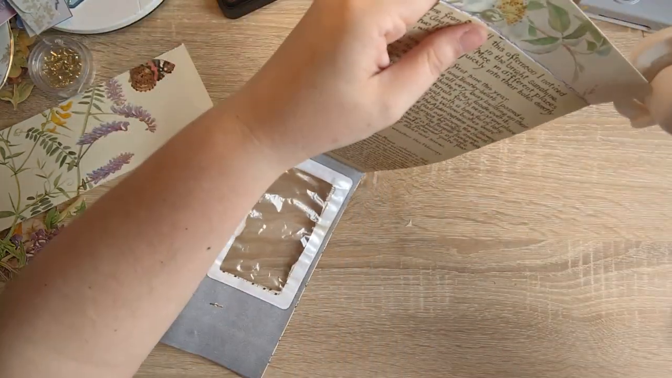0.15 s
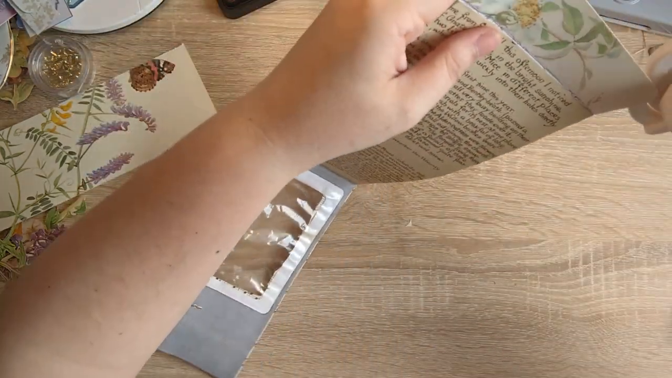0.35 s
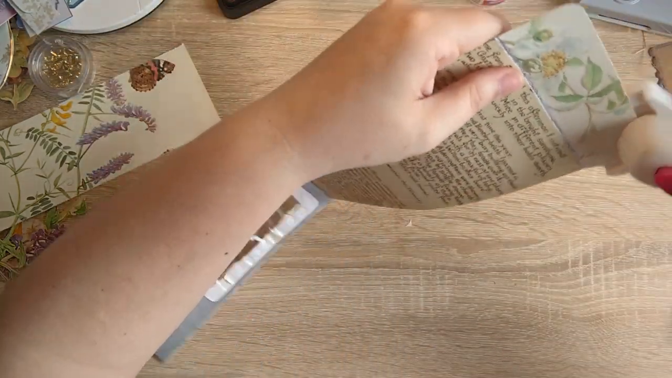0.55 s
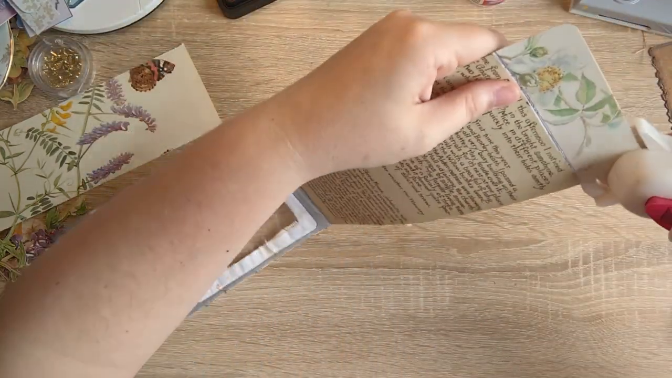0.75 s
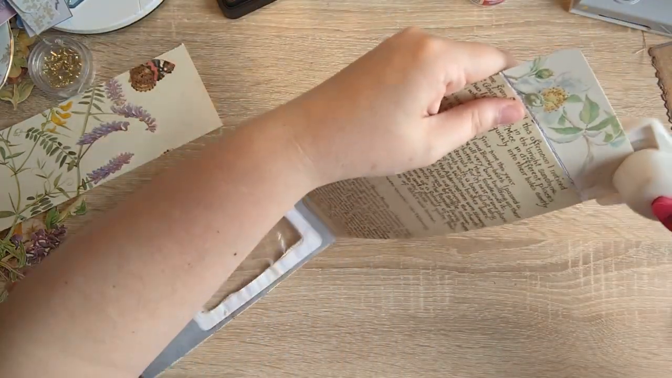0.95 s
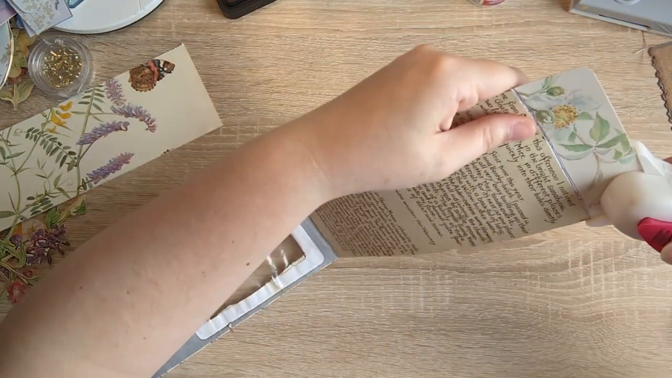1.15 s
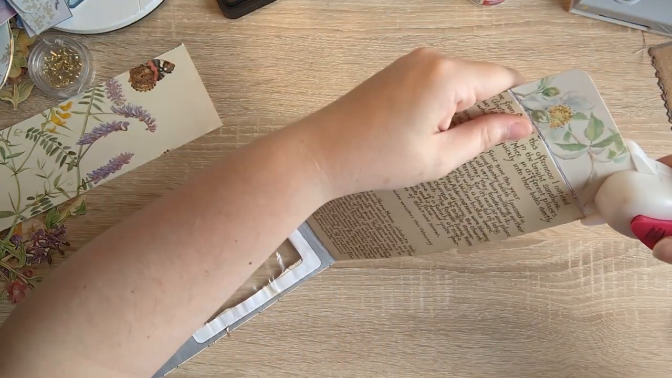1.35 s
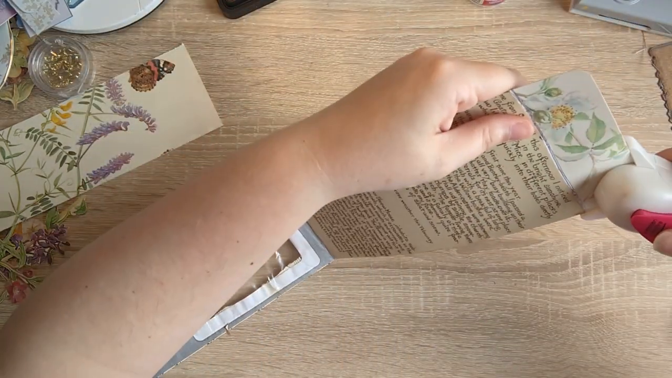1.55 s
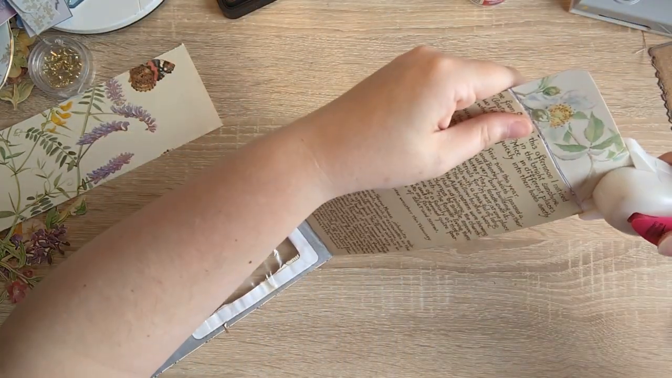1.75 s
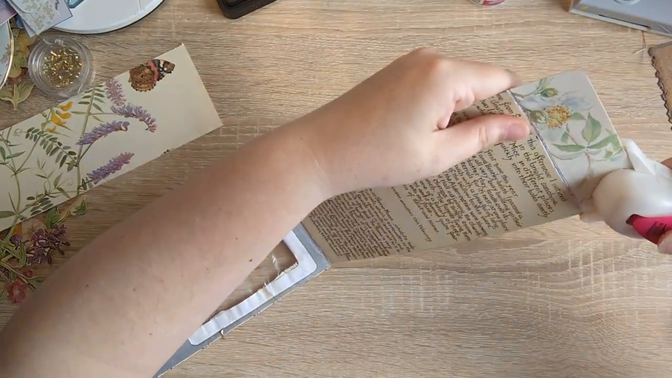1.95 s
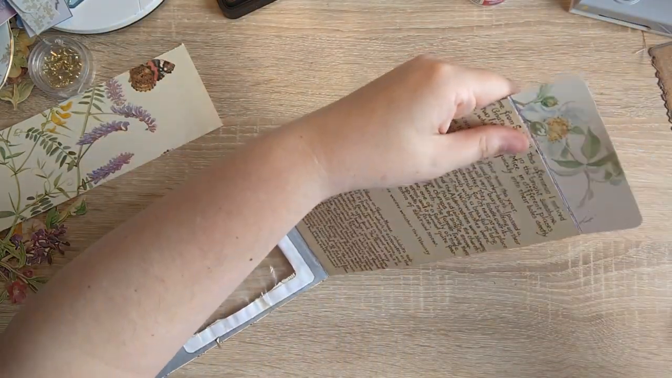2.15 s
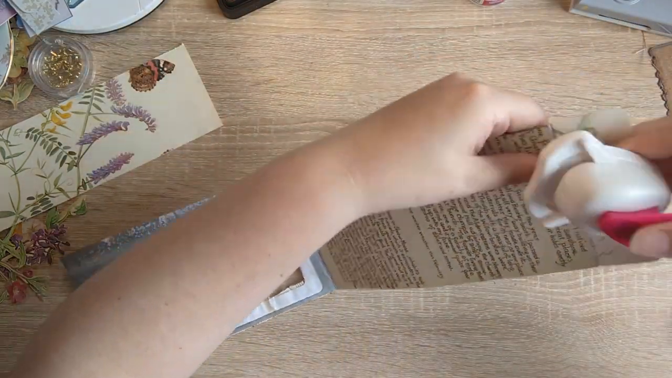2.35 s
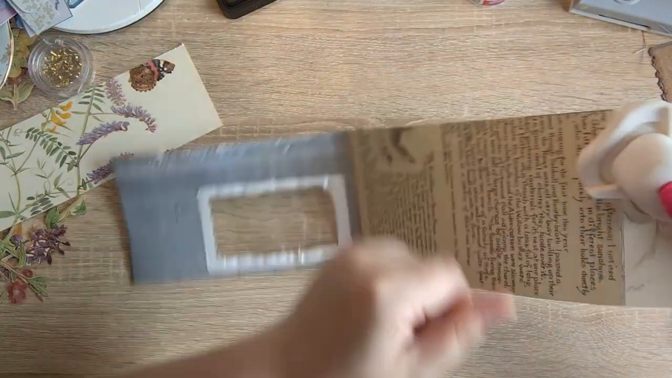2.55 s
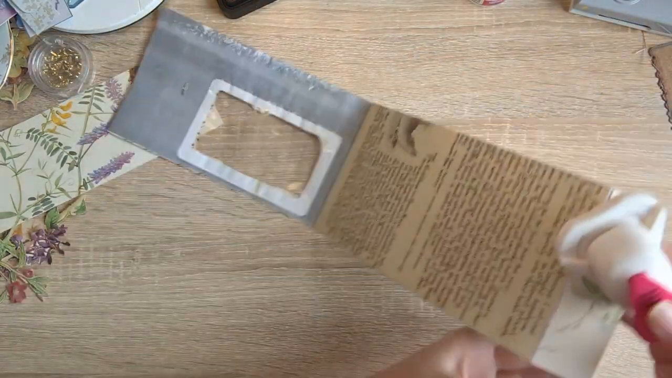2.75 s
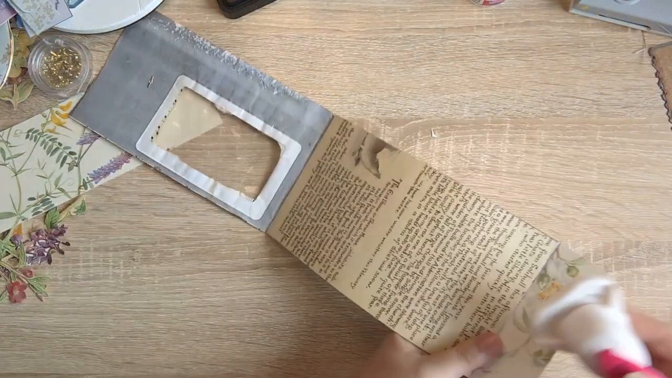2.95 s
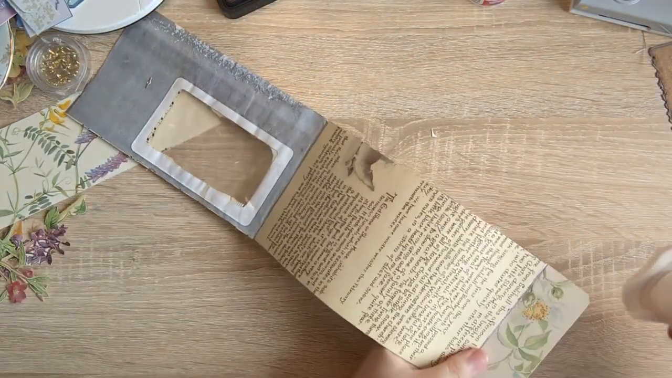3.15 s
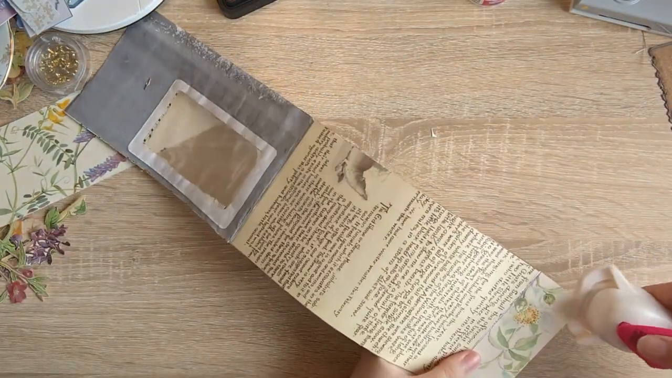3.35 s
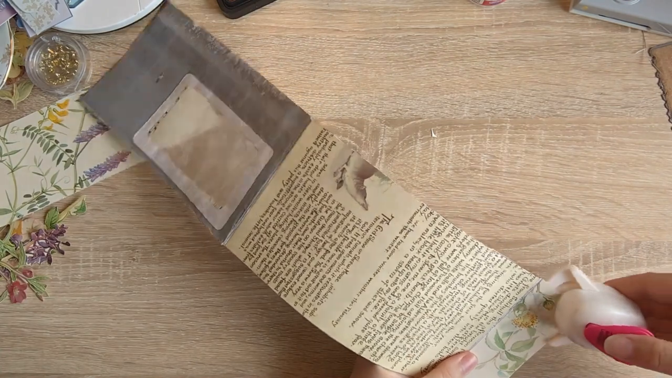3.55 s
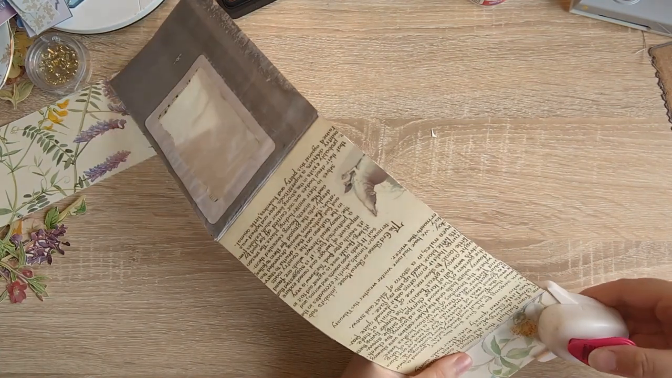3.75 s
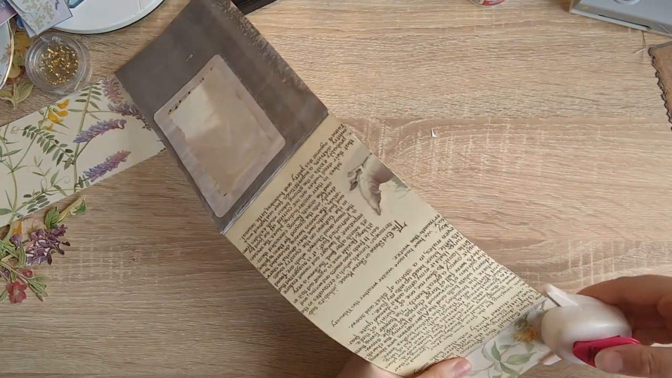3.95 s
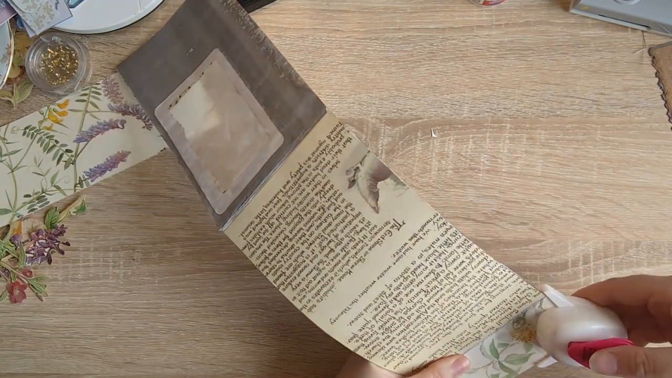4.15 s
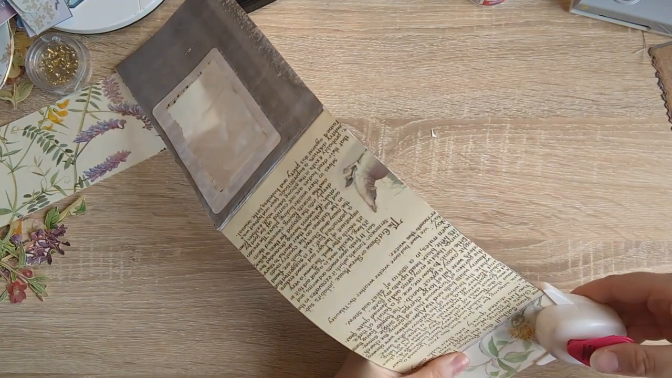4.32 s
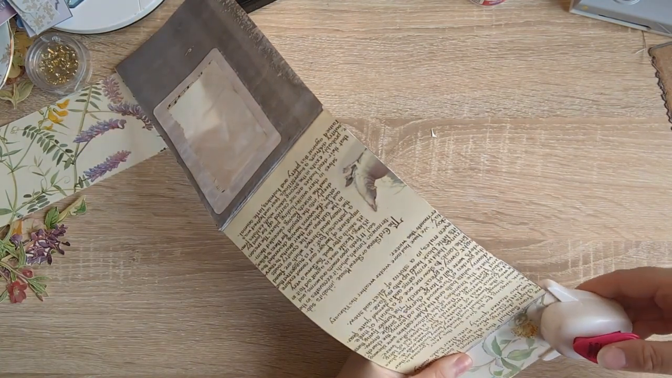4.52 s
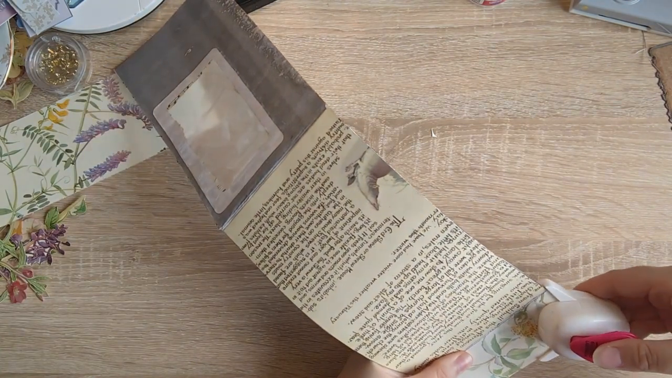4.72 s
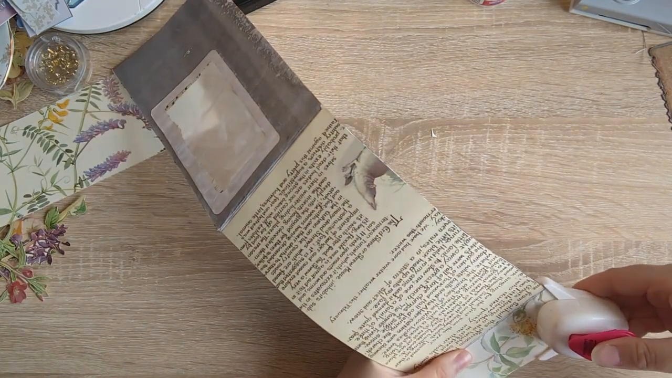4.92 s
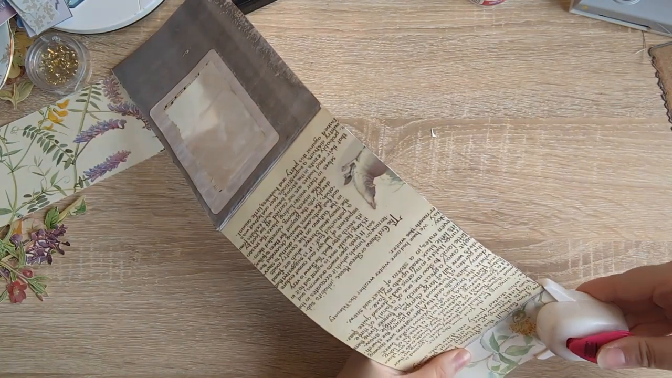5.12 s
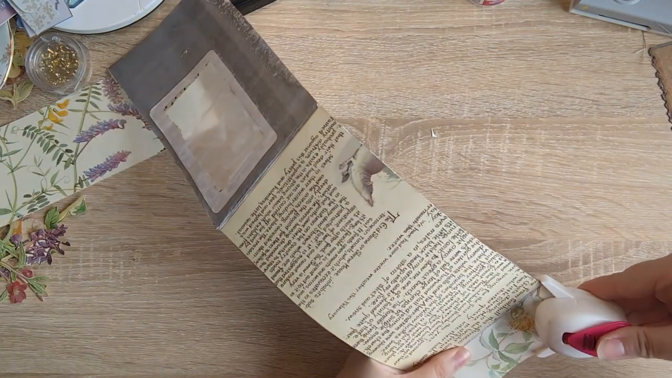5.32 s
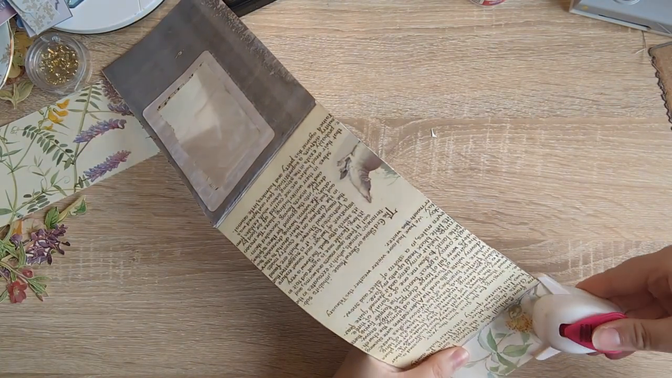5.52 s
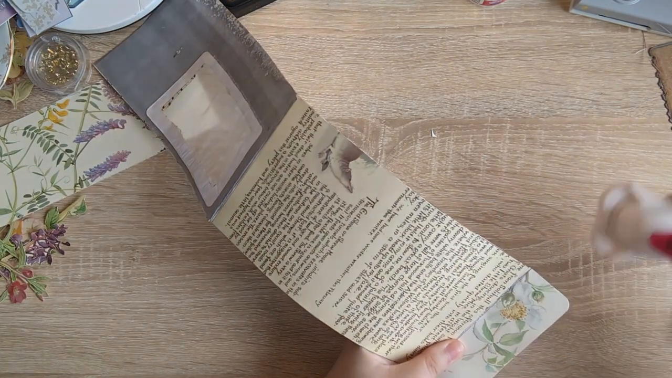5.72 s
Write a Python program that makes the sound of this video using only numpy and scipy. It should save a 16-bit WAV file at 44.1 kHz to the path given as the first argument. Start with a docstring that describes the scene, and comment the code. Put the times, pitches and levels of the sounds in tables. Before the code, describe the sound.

Stiff paper rustles and taps against a plastic corner punch, which snaps through it twice with a loud crack.

```python
"""Corner punch at a desk

Small room, a spaced pair of microphones close by, a wooden desk below. Just right of centre a
hand-held plastic punch rounds two corners of a stiff paper wallet. The paper goes in with small
knocks; each cut is a crack that just reaches overload, a short crunch and faint ringing tones.
Between the cuts the paper is turned in the middle of the image, rustling and snapping."""
import sys
import numpy as np
from scipy import signal
from scipy.fft import rfft, irfft
from scipy.io import wavfile

SR = 44100
rng = np.random.default_rng(int(sys.argv[2]) if len(sys.argv) > 2 else 0)


def store_pcm(level_fs):
    """Save levels as 16-bit WAV."""
    pcm = np.round(np.clip(level_fs, -1, 1) * 32767).astype(np.int16)
    wavfile.write(sys.argv[1], SR, np.atleast_2d(pcm).T)


N = 259308

# room tone: f/Hz, spectral level/dB
ROOM_TONE_COLOUR = [(15, -48), (25, -4), (102, 0.5), (166, -5.5), (270, -16.5), (440, -15.5), (863, -15),
                    (2000, -6.5), (3500, -12.5), (9840, -15), (16000, -22.5)]
# decay of the room: f/Hz, t60/s
ROOM_DECAY = [(100, 0.093), (300, 0.15), (800, 0.2), (2000, 0.19), (5000, 0.25), (10000, 0.19),
              (16000, 0.22)]
# low ring of the desk top: f/Hz, width/Hz, level/dB
DESK_MODES = [(166, 19, -9.5), (337, 11.7, -4), (440, 37, -9), (580, 97, -5.5)]
# colours of paper flapping, flexing and snapping, a metal tick and a cut: f/Hz, spectral level/dB
FLAP_COLOUR = [(40, -9), (100, 15), (200, -10.5), (400, 3), (700, 5), (1500, -9.5)]
FLEX_COLOUR = [(300, -38), (800, -13.5), (1400, 0), (2100, 4), (2800, 0), (4000, -16.5), (8000, -41)]
SNAP_COLOUR = [(1200, -25.5), (2500, -46), (3400, 0.5), (5000, -2), (7000, -1), (9000, -4.5), (12000, -5),
               (16000, -3.5)]
TICK_COLOUR = [(1500, -5.5), (3000, 7), (4000, 6), (5100, -3.5), (6300, 8), (8000, -1), (10000, 7.5),
               (13000, -3), (16000, -3)]
BLADE_COLOUR = [(30, -34.5), (60, -24), (200, -27.5), (330, -18), (450, -20), (700, -17.5), (1300, -8.5),
                (1800, 0.5), (2200, 0), (2900, -5), (4000, -6), (5100, -12.5), (6400, -5.5), (8000, -11),
                (9500, -1.5), (11300, -5.5), (14500, -5), (16000, -8.5)]
# boom of the sheet and knock of the plastic shell: multiple of the pitch, spectral level/dB
BOOM_SHAPE = [(.08, -46), (.2, -9), (.5, -9.5), (1, 4), (1.5, 0.5), (2.4, -7.5), (5, -31.5)]
SHELL_SHAPE = [(.1, -43.5), (.28, -34), (.42, -10.5), (.6, -2), (.8, 1), (1, 0.5), (1.35, -1.5),
               (1.7, -11.5), (3, -21.5), (6, -33)]
# the loose end swings: middle t/s, half length/s, level/dB
SHEET_SWINGS = [(1.0, .3, -68), (3.02, .07, -50.5), (3.737, 0.14, -45)]
# the paper slides: t/s, length/s, level/dB, rub on the punch re hiss/dB
SHEET_SLIDES = [(0.066, 1, -65.5, -1), (0.255, 0.021, -58.5, 7), (0.684, 0.6, -55, 0),
                (0.773, 0.032, -39.5, 0), (1.208, 0.13, -45, -1.5), (2.03, 0.13, -52.5, 0.5),
                (2.18, 0.51, -65.5, 1.5), (2.43, 0.15, -57.5, 4), (2.733, 0.37, -51, -7),
                (3.143, 0.095, -59, -6), (3.398, 0.41, -63.5, 1), (3.64, 0.48, -63.5, 5.5),
                (4.183, 0.057, -49.5, 2), (4.607, 0.09, -62.5, 2.5), (4.756, 0.1, -57, 3.5),
                (5.692, .13, -46.5, -0.5)]
# soft swells and two short dull knocks of the sheet: middle t/s, half length/s, f/Hz, level/dB
SHEET_SWELLS_AND_KNOCKS = [(2.148, 0.038, 267, -24.5), (2.464, 0.015, 231, -18), (3.035, 0.0023, 975, -22),
                           (3.563, 0.089, 760, -23), (3.69, 0.021, 570, -16), (5.477, 0.0051, 483, -18.5),
                           (5.76, 0.018, 358, -21.5)]
# the paper buckles: t/s, level/dB
SHEET_SNAPS = [(0.9139, -7.5), (1.1907, -14), (2.4664, -20), (2.499, -20.5), (2.533, -18), (2.6417, -23),
               (2.6489, -13.5), (2.703, -10.5), (2.799, -17.5), (2.886, -17), (2.9057, -17.5),
               (2.9793, -18.5), (3.0461, -14.5), (3.0729, -9), (3.1356, -5.5), (3.223, -14.5),
               (3.237, -18.5), (3.345, -19.5), (3.7281, -14.5), (3.8233, -14.5), (5.7902, -12.5)]
# the free part of the sheet booms higher with each grip: from t/s, f/Hz, desk contact/dB
SHEET_GRIPS = [(0, 330, -1.5), (2.9, 480, 5.5), (4.5, 700, 3)]
# paper and fingers knock on the punch: t/s, level/dB, shell f/Hz, metal tick re knock/dB
PUNCH_KNOCKS = [(0.1447, -15.5, 1790, -3.5), (0.4396, -30, 2170, -11), (0.5864, -29.5, 2270, -12),
                (0.6407, -7.5, 1700, -52), (0.7227, -23, 2000, 1), (0.7849, -18, 2130, -8),
                (0.822, -23.5, 2300, 7), (0.8938, -10.5, 1790, -3.5), (0.9469, -18.5, 1580, 0.5),
                (1.0349, -8.5, 2110, -3), (1.0683, -4.5, 2170, -3.5), (1.2005, -8.5, 1800, -7.5),
                (1.2406, -18, 1940, 6.5), (1.251, -8.5, 2060, -10), (1.294, -20.5, 2330, 12.5),
                (2.125, -24.5, 1840, 1), (3.413, -26, 2300, -1), (3.498, -28.5, 2020, -20),
                (3.5251, -20.5, 1920, -17), (3.641, -7.5, 1970, -18.5), (3.7444, -11, 2200, -10),
                (3.991, -25.5, 1830, -2.5), (4.0467, -28.5, 2040, -4), (4.083, -25, 2120, -2.5),
                (4.2012, -16.5, 1520, -4.5), (4.4815, -31, 2300, 3.5), (4.8073, -8, 1480, -9),
                (5.625, -29.5, 1510, -29), (5.6671, -15, 2100, -13)]
# faint ringing tones after each cut: f/Hz, level/dB, t60/s
CUT_RING_TONES = [(1800, 16, 0.18), (1885, -5.5, 0.27), (2260, -2.5, 0.52), (2240, -4.5, .18),
                  (2300, -15.5, 0.23), (3350, -20.5, 0.067), (3550, -1.5, 0.057), (5700, -16, 0.06),
                  (6584, -4, .15), (8300, 12.5, 0.064), (9330, -7, .15), (9100, -14.5, .16),
                  (11600, -2.5, .18), (13200, -7.5, 0.23), (13200, -3, .2), (14800, -6, 0.1),
                  (13500, -18.5, .12), (13200, -6.5, .14), (14930, 0, 0.093)]
# the cuts: t/s, crack/dB, crunch/dB, hollow shell ring f/Hz, its level/dB, desk thud/dB
CORNER_CUTS = [(1.9123, 15.5, 16, 886, -5, -19.5), (5.3974, 13, 16.5, 455, -9, -24)]

MIC_GAP_S = .00038   # travel time between the microphones, about 13 cm


def from_db(db):
    """Decibels to gain."""
    return 10 ** (np.asarray(db) / 20)


def unit(x):
    """Scale to a mean energy of one per channel."""
    return x / np.sqrt(np.mean(np.sum(x ** 2, axis=-1)) + 1e-20)


def add(track, s, sound):
    """Mix a sound into a track at time s."""
    start = round(s * SR)
    track[start:start + len(sound)] += sound[:N - start]


def pitched(shape, hz):
    """Place a colour given in multiples of a pitch at that pitch."""
    return [(multiple * hz, db) for multiple, db in shape]


def coloured(x, colour):
    """Causal (minimum-phase) filter; the colour is read on a log-frequency axis."""
    size = 2 ** 12
    hz = np.maximum(np.fft.rfftfreq(size, 1 / SR), 1)
    knot_hz, knot_db = np.transpose(colour)
    gain = from_db(np.interp(np.log(hz), np.log(knot_hz), knot_db))
    cepstrum = irfft(np.log(gain))
    cepstrum[1:size // 2] *= 2
    cepstrum[size // 2 + 1:] = 0
    response = np.array(irfft(np.exp(rfft(cepstrum))), ndmin=x.ndim)
    return signal.fftconvolve(x, response, axes=-1)[..., :x.shape[-1]]


def resonance(x, hz, width_hz):
    """Two-pole resonance with a peak gain of one."""
    r = np.exp(-np.pi * width_hz / SR)
    feedback = [1, -2 * r * np.cos(2 * np.pi * hz / SR), r * r]
    return signal.lfilter(np.array([1, 0, -1]) * (1 - r * r) / 2, feedback, x)


def contact(spread_s, patchy_db):
    """A touch whose frequencies arrive scattered over a moment, each a little stronger or weaker."""
    size = 2 ** 13
    hz = np.fft.rfftfreq(size, 1 / SR)
    knots = np.linspace(0, SR / 2, num=90)
    delay_s = np.interp(hz, knots, spread_s * np.minimum(rng.exponential(1, len(knots)), 2))
    gain = from_db(np.interp(hz, knots, patchy_db * rng.standard_normal(len(knots))))
    phase = -2 * np.pi * np.cumsum(delay_s) * hz[1]
    return unit(irfft(gain * np.exp(1j * phase))[:size // 2])


def grains(per_s, spread_db, size):
    """Random tiny clicks of uneven strength; rms 1."""
    born = rng.random(size) < per_s / SR
    strength = from_db(spread_db * np.minimum(rng.exponential(1, size), 4))
    return unit(born * strength * rng.standard_normal(size)) * np.sqrt(size)


def diffuse(size):
    """Noise from all directions on the spaced pair: alike in the bass only."""
    alike = .95 * np.sinc(2 * np.fft.rfftfreq(size, 1 / SR) * MIC_GAP_S)
    mid, side = rfft(rng.standard_normal((2, size)))
    return irfft(np.sqrt(1 + alike) * mid + np.sqrt(1 - alike) * side * [[1], [-1]], size)


def room_tone(rms_db):
    """Faint, steady, bass-heavy noise all round the microphones."""
    return from_db(rms_db) * unit(coloured(diffuse(N), ROOM_TONE_COLOUR)) * np.sqrt(N)


def in_room(x, lag_s, pan_db, room_db, desk_db, smear_s):
    """At the pair: direct sound smeared by the hands, a desk bounce, a tail dying band by band."""
    size = SR // 2
    t, hz = np.arange(size) / SR, np.fft.rfftfreq(size, 1 / SR)
    noise = rfft(diffuse(size))
    log_centres = np.log([centre_hz for centre_hz, _ in ROOM_DECAY])
    tail = 0
    for share, (_, t60) in zip(np.eye(len(ROOM_DECAY)), ROOM_DECAY):
        band = irfft(noise * np.interp(np.log(hz + 1), log_centres, share), size)
        tail += band * from_db(-60 * t / t60)
    build_up = np.clip((t - .001) / .0013, 0, 1)
    response = from_db(room_db) * unit(tail * build_up)
    left, right = (lag_s, pan_db / 2, .0013), (0, -pan_db / 2, .0011)
    for channel, (late_s, side_db, bounce_s) in enumerate([left, right]):
        path = from_db(side_db) * contact(spread_s=smear_s, patchy_db=0.5)
        add(response[channel], late_s, path)
        add(response[channel], late_s + bounce_s, from_db(desk_db) * path)
    return signal.fftconvolve(x[None], response, axes=1)[:, :N]


def desk(touch, uneven_db):
    """The low modes of the desk top, each as strong as the chance place of the blow makes it."""
    return sum(from_db(db + uneven_db * rng.standard_normal()) * unit(resonance(touch, hz, width_hz))
               for hz, width_hz, db in DESK_MODES)


def rustle(colour, per_s, spread_db):
    """Fibres catch and slip at random; rms 1."""
    return unit(coloured(grains(per_s, spread_db, N), colour)) * np.sqrt(N)


def swings(flap_db):
    """The loose end flaps softly as it swings through the air."""
    t = np.arange(N) / SR
    speed = sum(from_db(db) * np.exp(-((t - s) / half_s) ** 2) for s, half_s, db in SHEET_SWINGS)
    return from_db(flap_db) * speed * rustle(FLAP_COLOUR, per_s=920, spread_db=3.5)


def slides(hiss_db, rub_db, crackle_db):
    """Each stroke speeds up, holds and dies away: the sheet hisses, crackles and rubs on the punch."""
    attack_s, release_s = 0.025, 0.01
    t = np.arange(N) / SR
    sliding, rubbing = np.zeros(N), np.zeros(N)
    for s, length_s, db, on_punch_db in SHEET_SLIDES:
        stroke = np.clip((t - s) / attack_s, 0, 1)
        stroke *= np.exp(-np.maximum(t - s - length_s, 0) / release_s)
        sliding = np.maximum(sliding, from_db(db) * stroke)
        rubbing = np.maximum(rubbing, from_db(db + on_punch_db) * stroke)
    hiss = from_db(hiss_db) * rustle(SNAP_COLOUR, per_s=5600, spread_db=5)
    hiss += from_db(crackle_db) * rustle(SNAP_COLOUR, per_s=90, spread_db=2.5)
    rub = from_db(rub_db) * rustle(FLEX_COLOUR, per_s=2500, spread_db=1)
    rub += from_db(crackle_db) * rustle(FLEX_COLOUR, per_s=90, spread_db=2.5)
    return sliding * hiss + rubbing * rub


def swells_and_dull_knocks():
    """Noise in a resonance of the sheet: soft swells, the two shortest heard as dull knocks."""
    out, t = np.zeros(N), np.arange(N) / SR
    for s, half_s, hz, db in SHEET_SWELLS_AND_KNOCKS:
        boom = coloured(rng.standard_normal(N), pitched(BOOM_SHAPE, hz))
        envelope = np.exp(-((t - s) / half_s) ** 2)
        out += from_db(db) * unit(boom * envelope)
    return out


def snaps(bend_octaves, bend_db):
    """A crease pops and the sheet flexes; bent in the turn it stiffens, flexing higher and less."""
    turn_start_s, turn_end_s, ramp_s = 2.65, 3.283, 0.061
    out = np.zeros(N)
    for s, db in SHEET_SNAPS:
        pop = contact(spread_s=0.0021, patchy_db=2)
        bend = np.clip(min(s - turn_start_s, turn_end_s - s) / ramp_s, 0, 1)
        flex = coloured(pop, pitched(FLEX_COLOUR, 2 ** (bend_octaves * bend)))
        add(out, s, from_db(db) * unit(coloured(pop, SNAP_COLOUR)))
        add(out, s, from_db(db + bend_db * bend) * unit(flex))
    return out


def knocks(shell_db, boom_db, tick_db, desk_db):
    """Each touch rings the damped plastic shell, thumps sheet and desk, and ticks on the metal."""
    shell_hz, firm_knock_db = 1806, -2
    out = np.zeros(N)
    for s, db, hz, metal_db in PUNCH_KNOCKS:
        touch = contact(spread_s=0.0014, patchy_db=3)
        sheet_hz, on_desk_db = [grip[1:] for grip in SHEET_GRIPS if grip[0] <= s][-1]
        # a lower or heavier knock reaches deeper into sheet and desk
        depth_db = -16 * np.log2(hz / shell_hz) + 0.22 * (db - firm_knock_db)
        parts = [(pitched(SHELL_SHAPE, hz), shell_db),
                 (pitched(BOOM_SHAPE, sheet_hz), boom_db + depth_db),
                 (TICK_COLOUR, tick_db + metal_db)]
        for colour, part_db in parts:
            add(out, s, from_db(db + part_db) * unit(coloured(touch, colour)))
        add(out, s, from_db(db + desk_db + on_desk_db + depth_db) * desk(touch, uneven_db=8))
    return out


def cuts(crack_s, crunch_s, ring_db):
    """The blade cracks through and crunches past the fibres; the shell and faint tones ring on."""
    out, t = np.zeros(N), np.arange(SR // 2) / SR
    swell = t / crunch_s * np.exp(-(t / crunch_s) ** 2)
    for s, crack_db, crunch_db, hollow_hz, hollow_db, thud_db in CORNER_CUTS:
        fibres = grains(per_s=12000, spread_db=0.61, size=len(t))
        force = from_db(crunch_db) * unit(fibres * swell)
        add(force, 0, from_db(crack_db) * contact(spread_s=crack_s, patchy_db=1.5))
        blow = unit(coloured(force, BLADE_COLOUR)) * np.linalg.norm(force)
        ring = sum(from_db(db - 60 * t / t60) * np.sin(2 * np.pi * hz * t) * rng.choice([-1, 1])
                   for hz, db, t60 in CUT_RING_TONES)
        hollow = from_db(hollow_db) * unit(resonance(force, hollow_hz, width_hz=160))
        thud = from_db(thud_db) * unit(resonance(force, hz=58, width_hz=38))
        add(out, s, blow + from_db(ring_db) * unit(ring) + hollow + thud)
    return out


def scene():
    """From the microphones: the punch to the right, the paper across the middle, room tone around."""
    paper = snaps(bend_octaves=0.31, bend_db=-6.5) + swells_and_dull_knocks()
    paper += slides(hiss_db=-4.5, rub_db=-5, crackle_db=-7) + swings(flap_db=-10)
    cutting = cuts(crack_s=.0009, crunch_s=0.029, ring_db=-6)
    feeding = knocks(shell_db=5.5, boom_db=-7, tick_db=3, desk_db=-18.5)
    out = room_tone(rms_db=-64)
    moved = np.arange(N) / SR > 2.9   # the punch goes to the second corner
    for here in (~moved, moved):   # each corner has its own reflections
        out += in_room(cutting * here, lag_s=.00022, pan_db=-4.5,
                       room_db=0.5, desk_db=-9.5, smear_s=.0001212)
        out += in_room(feeding * here, lag_s=.00017, pan_db=-2.5,
                       room_db=1, desk_db=-5.5, smear_s=.0001)
        out += in_room(paper * here, lag_s=.00001, pan_db=-1,
                       room_db=1.5, desk_db=-10, smear_s=.00004)
    return out


def record(dry):
    """The recorder rounds off peaks near full scale and cuts the top steeply."""
    cutoff_hz = 15850
    rounded = dry / (1 + dry ** 6) ** (1 / 6)
    return signal.sosfilt(signal.ellip(12, .2, 80, cutoff_hz, fs=SR, output="sos"), rounded)


dry = scene()
out = record(dry)
store_pcm(out)
```